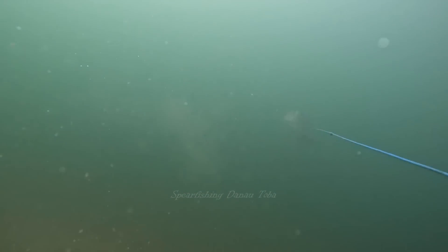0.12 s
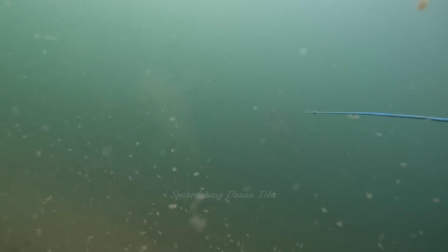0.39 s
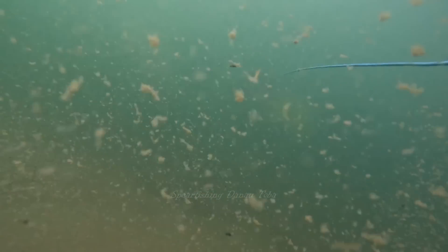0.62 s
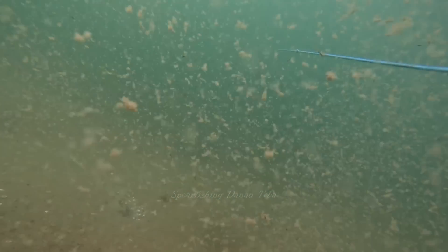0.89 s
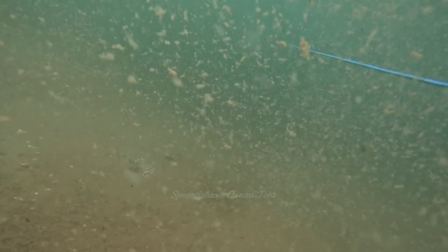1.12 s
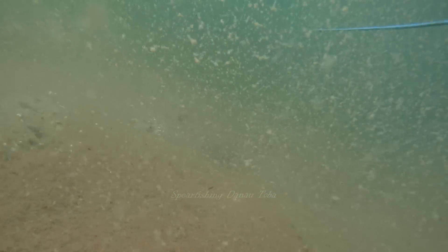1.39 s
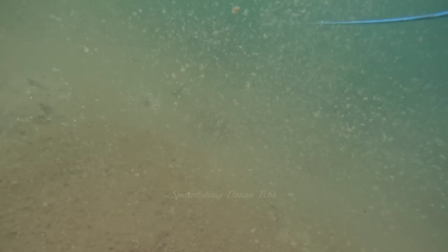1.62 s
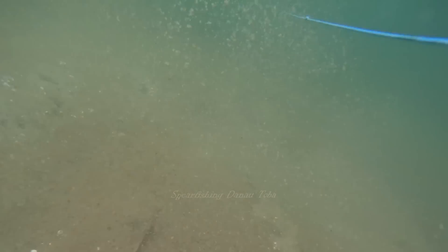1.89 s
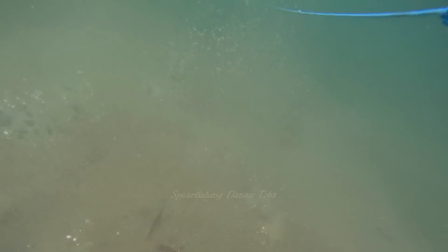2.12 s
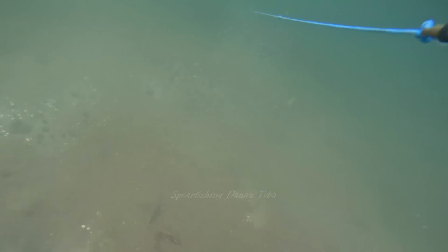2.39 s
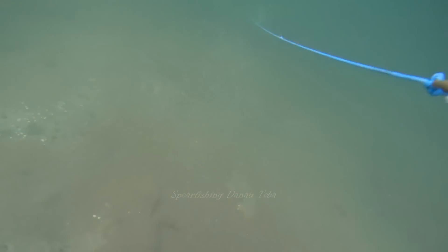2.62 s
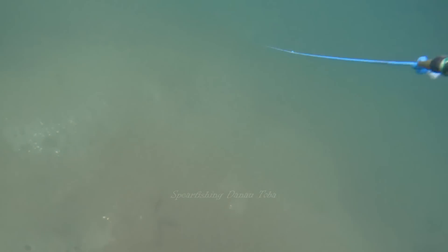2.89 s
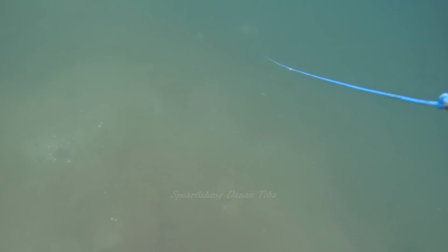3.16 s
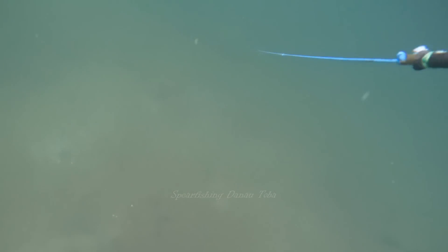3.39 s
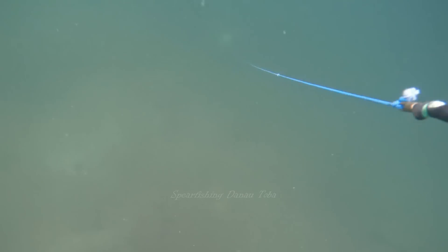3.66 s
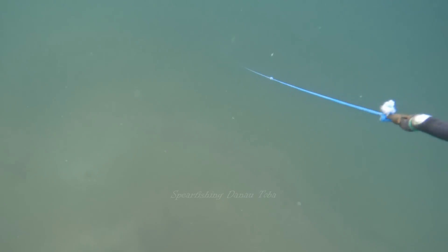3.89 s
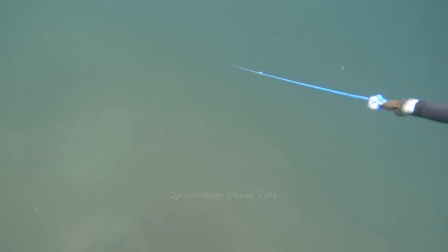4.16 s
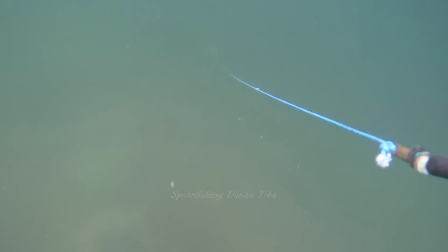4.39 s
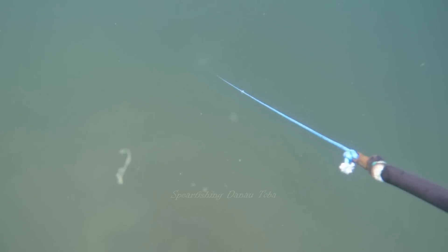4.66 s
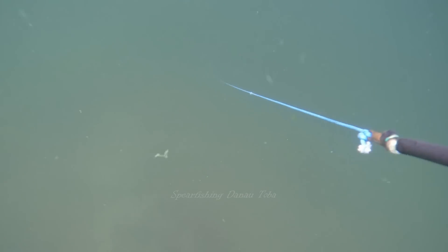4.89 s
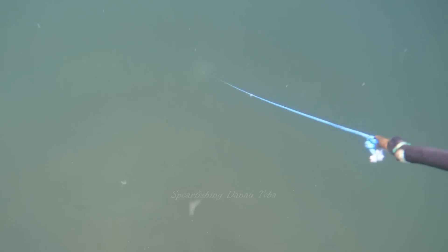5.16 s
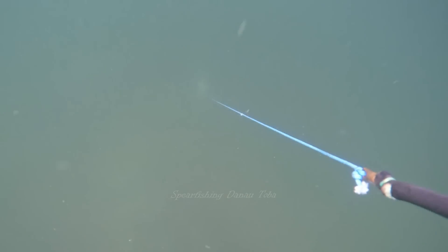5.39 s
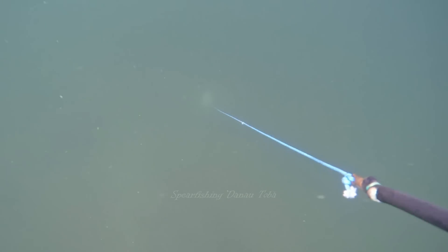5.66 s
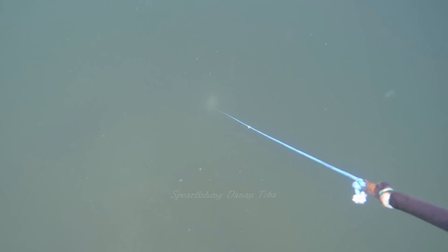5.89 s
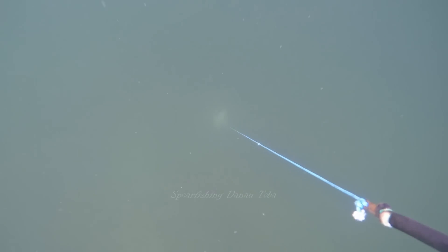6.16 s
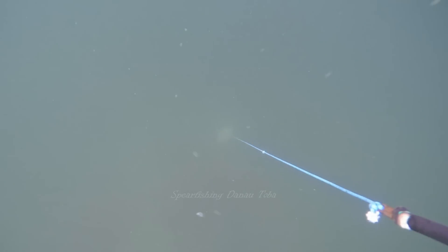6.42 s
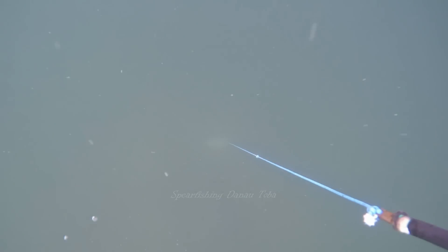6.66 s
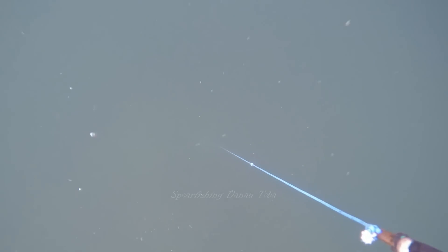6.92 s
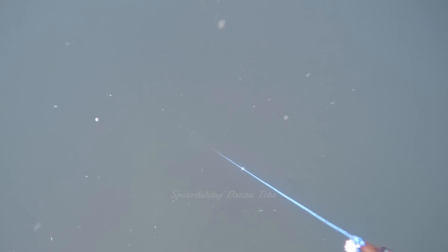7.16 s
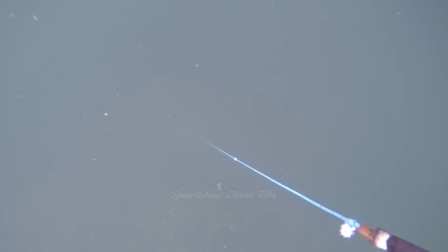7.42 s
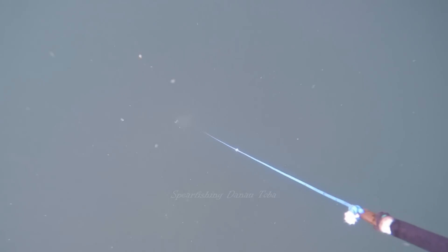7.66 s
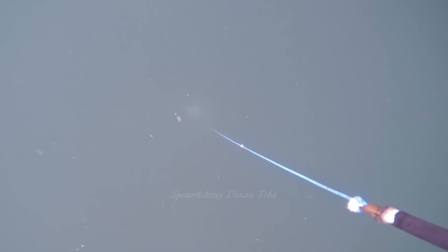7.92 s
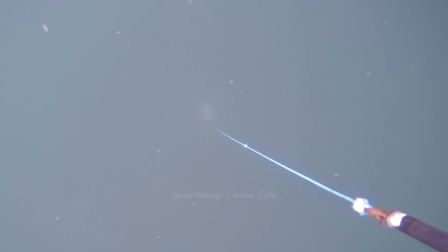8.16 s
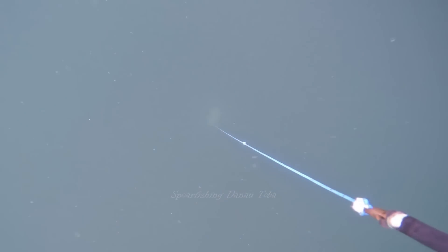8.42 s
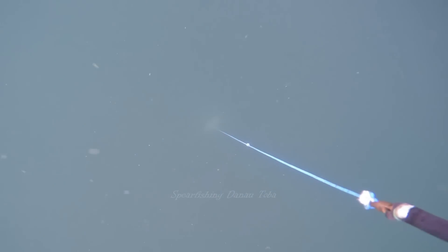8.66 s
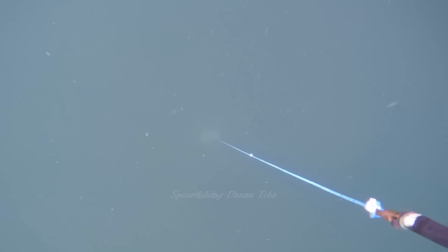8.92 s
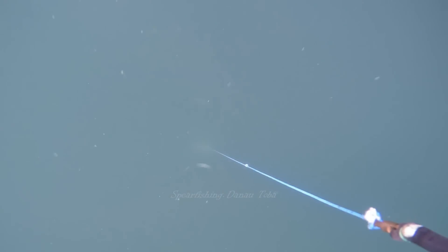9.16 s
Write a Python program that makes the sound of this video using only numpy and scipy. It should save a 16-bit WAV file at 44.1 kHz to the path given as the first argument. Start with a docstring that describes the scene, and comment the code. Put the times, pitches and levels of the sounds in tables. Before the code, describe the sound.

Underwater sound inside a plastic housing carried by a diver: boxy, muffled and dominated by bass. The first second is very quiet, with a soft knock at the start, faint rubber ticks and a dull rap near 0.75 s. A hard, hollow knock lands at 1.3 s, a creak at 1.4 s, and from 1.5 to 1.8 s deep surge and rumbling flow swell up with a few bubble pings. From 2 to 5 s low tones throb unsteadily, dull thuds come often, strongest around 3.3, 3.9 and 4.2 s, and rubber creaks stutter near 2.4, 3.6 and 4.5 s. From 4.1 s bubbles fizz and ping, crowding at 5.9, 6.1 and 6.7 to 7.2 s with sharp bright ticks. After 7.3 s they thin over continuing rumble; a knock at 8.6 s, a clear ping and tick at 8.9 s, and light fizz lead to the end at 9.3 s.

```python
"""Under water, a camera in a plastic housing rides on a diver.
Surge rocks the mount as slow heaving noise and unsteady low tones; flow drums on the shell as shaped noise.
Gear knocks and rubber creaks ring the shell's modes; small bubbles ping as damped sines and fizz close by.
Two microphones inside the shell hear the bass alike and its higher modes unequally."""
import sys
import numpy as np
from scipy import signal
from scipy.fft import rfft, irfft, next_fast_len
from scipy.io import wavfile
from scipy.ndimage import uniform_filter1d, map_coordinates

SR = 44100
rng = np.random.default_rng(int(sys.argv[2]) if len(sys.argv) > 2 else 0)


def int16_out(signal):
    """Quantize to a 16-bit WAV file."""
    q = np.round(np.clip(np.atleast_2d(signal).T, -1, 1) * 32767)
    wavfile.write(sys.argv[1], SR, q.astype(np.int16))


def gain_from_db(level_db):
    """Convert decibel levels to linear amplitude factors (20 dB per decade)."""
    decades = np.asarray(level_db, float) / 20
    return 10 ** decades


N = 410130  # length in samples


def unit(x):
    """Scale to rms 1."""
    return x / np.sqrt(np.mean(x ** 2) + 1e-20)


def along(points, hz):
    """Read a curve of (frequency [Hz], value) points on a log-frequency axis."""
    f, v = np.transpose(points)
    return np.interp(np.log(hz + 1), np.log(f + 1), v)


def curves(rows):
    """Draw one value per sample for each column after the time."""
    s, *cols = np.transpose(rows)
    return [np.interp(np.arange(N) / SR, s, c) for c in cols]


def wobble(rate):
    """A smooth random curve with rate knots a second."""
    knots = rng.standard_normal(int(N * rate / SR) + 4)
    return map_coordinates(knots, [np.arange(N) * rate / SR])


def filtered(x, response):
    """Shape x by a complex response of frequency."""
    m = next_fast_len(N + SR // 2)
    return irfft(rfft(x, m) * response(np.fft.rfftfreq(m, 1 / SR)), m)[..., :N]


def modes(table):
    """Causal response of (frequency [Hz], width [Hz], level [dB]) resonances of alternating sign."""
    def response(f):
        total = 0
        for k, (centre, width, db) in enumerate(table):
            resonance = 1j * f * width / (centre * centre - f * f + 1j * f * width)
            total = total + (-1) ** k * gain_from_db(db) * resonance
        return total
    return response


def causal(x, spectrum):
    """Pass x through the minimum-phase filter of a (frequency [Hz], level [dB]) spectrum, pulse peak 1."""
    cepstrum = irfft(np.log(gain_from_db(along(spectrum, np.fft.rfftfreq(2048, 1 / SR)))))
    cepstrum[1:1024] *= 2  # folding to positive time makes it minimum phase
    cepstrum[1025:] = 0
    pulse = irfft(np.exp(rfft(cepstrum)))
    return signal.fftconvolve(x, pulse[None] / np.abs(pulse).max(), axes=1)[:, :N]


def leading(pair, lead):
    """Put the left side ahead of the right by (frequency [Hz], phase [rad]) points."""
    return filtered(pair, lambda hz: np.exp(.5j * np.outer([1, -1], along(lead, hz))))


def grains(s, db, hz, t60, pan_db, attack, rise, bend=1):
    """Place damped sines left and right; their pitch climbs by the share rise over t60 seconds.

    A bend over 1 holds the ring, then cuts it."""
    t60 = np.clip(t60, .002, .11)[:, None]
    t = np.arange(min(SR // 16, int(t60.max() * SR))) / SR
    decay = gain_from_db(-60 * (t / t60) ** bend)
    onset = 1 - np.exp(-t / attack)
    ring = decay * onset * np.sin(2 * np.pi * hz[:, None] * t * (1 + rise * t / t60 / 2))
    ring *= gain_from_db(db)[:, None] / np.abs(ring).max(axis=1, keepdims=True)
    at = (np.round(s * SR).astype(int)[:, None] + np.arange(len(t))).ravel()
    sides = [(ring * gain_from_db(k * pan_db / 2)[:, None]).ravel() for k in (1, -1)]
    return np.array([np.bincount(at, side, N + SR)[:N] for side in sides])


def bouts(rows, rise, bend):
    """Gain of events that swell in the share rise of their fading time; bend shapes the slopes."""
    t = np.arange(0, N, 32) / SR
    power = 0
    for s, db, length, *_ in rows:
        away = np.maximum(t - s, (s - t) / max(rise, .05)) / max(length, .02)
        power = power + gain_from_db(db - 20 * away ** bend) ** 2  # 20 dB down one length after the peak
    return np.interp(np.arange(N) / SR, t, np.sqrt(power))


# left-right likeness of the noise: (frequency [Hz], coherence [0..1])
LIKENESS = [(60, 0.99), (300, 0.97), (450, 0.91), (700, 0.41), (3000, 0.057), (10000, 1)]


def rush(spectrum, patchy_db):
    """Stereo noise of rms 1 with patches of random gain in time and frequency."""
    z = signal.stft(rng.standard_normal((2, N)), nperseg=512)[2]
    field = uniform_filter1d(rng.standard_normal(z.shape[1:]), size=5, axis=0)
    field = uniform_filter1d(field, size=6, axis=1)
    pair = signal.istft(z * gain_from_db(patchy_db * unit(field)), nperseg=512)[1][:, :N]

    def mid_side(hz):
        turn = np.arccos(np.clip(along(LIKENESS, hz), -1, 1)) / 2
        return gain_from_db(along(spectrum, hz)) * [np.cos(turn), np.sin(turn)]

    mid, side = filtered(pair, mid_side)
    return unit(np.array([mid + side, mid - side]))


# a click's colour through the shell: (frequency [Hz], relative level [dB])
SNAP_COLOUR = [(700, -33), (1500, 3.5), (2200, 3), (3300, -1), (4200, -7), (5200, 1), (6000, -15),
               (6800, 3), (7300, -11.5), (7800, -15), (10000, -24.5), (15000, -38)]


def snapping(at, db, pan_db, life):
    """Each snap is a puff of noise fading over life seconds, coloured by the shell."""
    starts = np.zeros((2, N))
    starts[:, at] = gain_from_db(db + np.outer([.5, -.5], pan_db))
    puffs = signal.fftconvolve(starts, np.exp(-np.arange(600) / SR / life)[None], axes=1)[:, :N]
    noise = rng.standard_normal(N) + 0.11 * rng.standard_normal((2, N))  # nearly alike on both sides
    return causal(puffs * noise, SNAP_COLOUR)


# the flow: (time [s], strength [dB], eddies over their usual share [dB])
FLOW_COURSE = [(0.0, -60.5, -2), (0.2, -68.5, 2.5), (0.49, -65, 6.5), (0.77, -53.5, -1),
               (1.11, -52.5, 10.5), (1.53, -39.5, -2), (1.76, -41, 3.5), (1.92, -44, 6), (2.64, -45, -2.5),
               (3.52, -43, 1), (4.07, -50, 3), (4.43, -48, -2), (4.56, -51, 7), (4.82, -51, -7.5),
               (4.97, -45.5, 2.5), (5.49, -51.5, 1.5), (6.16, -48, -1), (6.55, -49, -2), (6.99, -42, 1.5),
               (7.33, -46, -1.5), (7.87, -46, 5), (8.0, -41, -3), (8.39, -48.5, 1), (9.3, -50.5, 3)]


def driven(over_db, grows):
    """Level [dB] of a layer: over_db above the mean flow, growing by grows dB for each dB of flow."""
    flow_db = curves(FLOW_COURSE)[0]
    return flow_db.mean() + over_db + grows * (flow_db - flow_db.mean())


# surge rocking the mount: (time [s], level [dB], frequency [Hz])
ROCKING = [(0.0, -44, 17.5), (0.23, -41.5, 15.5), (0.6, -47.5, 15.5), (1.79, -16, 15.5),
           (1.94, -18.5, 16.8), (2.2, -20, 17.1), (2.33, -21.5, 19.6), (3.39, -21, 19.5), (3.52, -26, 18.2),
           (4.35, -30, 21.1), (4.5, -28, 19.6), (4.95, -24.5, 19.6), (5.1, -35, 24.9), (5.33, -24.5, 25.3),
           (5.52, -26.5, 19.5), (6.52, -28.5, 16.7), (6.86, -33.5, 16.8), (6.99, -25.5, 19.5),
           (7.51, -31.5, 18.7), (7.8, -27.5, 18.2), (8.88, -27.5, 17.8), (9.07, -38, 24.7),
           (9.25, -26.5, 26.2), (9.3, -46.5, 39)]
# bouts that shake the mount's springy mode: (peak time [s], level [dB], length [s], frequency [Hz])
SPRING_SHAKES = [(1.1, -47, 0.18, 45), (1.52, -32, 0.081, 63.4), (1.6, -28, 0.048, 59.4),
                 (1.81, -31, 0.15, 59.55), (2.07, -20.5, 0.076, 64.63), (2.25, -24, 0.091, 58.6),
                 (2.67, -25, 0.11, 66.33), (2.9, -33.5, 0.24, 62.9), (3.1, -20, 0.1, 61.13),
                 (3.26, -30, 0.03, 58.1), (3.44, -30, 0.32, 63.5), (3.89, -23.5, 0.32, 61.92),
                 (4.2, -23.5, 0.037, 63.03), (4.43, -31.5, 0.45, 70.05), (4.92, -29, 0.5, 59),
                 (5.05, -19, 0.12, 58), (5.33, -21.5, 0.18, 58.24), (5.52, -30.5, 0.13, 66),
                 (5.88, -18, 0.12, 53.2), (6.17, -20, 0.18, 58.8), (6.6, -30, 0.66, 62.46),
                 (6.79, -27, 0.21, 56.35), (7.2, -38, 0.22, 64.17), (7.49, -36, .15, 46.95),
                 (7.75, -26.5, 0.17, 58.4), (8.1, -21, 0.16, 61.85), (8.24, -42, 0.22, 66),
                 (8.57, -29, 0.096, 64.86), (8.78, -24.5, 0.09, 68.7), (9.15, -45, 0.084, 49.8)]
# swells of the shell's hum: (peak time [s], level [dB], length [s])
HUM_SWELLS = [(1.5, -48, 0.3), (2.59, -37.5, 0.22), (3.39, -42, 0.36), (3.9, -28.5, 0.28),
              (4.24, -29.5, 0.39), (4.48, -35, 0.42), (4.86, -38.5, 0.49), (5.25, -38.5, 0.88),
              (5.92, -36, 0.25), (6.5, -41, 0.67), (7.18, -32.5, 0.29), (7.54, -32.5, 0.46),
              (8.05, -37, 0.57), (8.9, -45.5, 0.62)]
# colour of the surge: (frequency [Hz], relative level [dB])
SURGE_COLOUR = [(8, -33.5), (14, -1.5), (24, 2), (34, -4.5), (48, -23.5), (100, -120)]


def mount():
    """Water keeps three low modes swinging with unsteady phase, while the surge itself heaves below."""
    rock_db, rock_hz = curves(ROCKING)
    spring_hz = curves(SPRING_SHAKES)[2]

    def tone(hz, loose):
        return np.sqrt(2) * np.sin(2 * np.pi * np.cumsum(hz * (1 + loose * wobble(12))) / SR)

    hum = gain_from_db(3.3 * wobble(14)) * tone(126.2, loose=0.055)
    heave = filtered(rng.standard_normal(N), lambda f: gain_from_db(along(SURGE_COLOUR, f)))
    surge = gain_from_db(-6.5) * unit(heave)
    idle = gain_from_db(driven(over_db=1.4, grows=0.32))  # the spring never quite rests
    spring = np.hypot(bouts(SPRING_SHAKES, rise=0.78, bend=0.95), idle) * tone(spring_hz, loose=0.0712)
    rocking = gain_from_db(rock_db) * (surge + tone(rock_hz, loose=0.1472))
    return rocking + spring + bouts(HUM_SWELLS, rise=0.25, bend=0.77) * hum


# colours of the three flow layers: (frequency [Hz], relative level [dB])
RUMBLE_COLOUR = [(15, -21.5), (28, -23.5), (45, -0.5), (70, -2), (100, -14), (150, -15.5), (200, -39),
                 (400, -120)]
DRUM_COLOUR = [(100, -33), (160, -3.5), (185, -3), (215, 3.5), (270, -5), (365, 2), (440, -8), (500, -3),
               (600, -21), (750, -36), (1500, -120)]
CHURN_COLOUR = [(450, -46), (650, 0), (800, -2), (950, -2.5), (1130, -9.5), (1370, -3), (1650, -17.5),
                (2000, -9), (4000, -120)]


def flow():
    """Turbulence rumbles and drums on the shell in lumps; stronger eddies gurgle in its higher modes."""
    rumble_db, drum_db = driven(over_db=10.8, grows=1), driven(over_db=0, grows=0.96)
    churn_db = driven(over_db=-20.5, grows=1.14) + curves(FLOW_COURSE)[1]
    lumps = wobble(22)
    rumble = gain_from_db(rumble_db + 1.9 * wobble(15.0)) * rush(RUMBLE_COLOUR, patchy_db=0.5)
    drum = gain_from_db(drum_db + 1.6 * lumps) * rush(DRUM_COLOUR, patchy_db=2.5)
    rough = np.clip((churn_db + 78.5) / 16, .15, 1.0)  # hard flow breaks into lumps, slack flow runs smooth
    churn_gain = gain_from_db(churn_db + rough * (2.8 * lumps + 3.2 * wobble(40)))
    churn = churn_gain * rush(CHURN_COLOUR, patchy_db=3.5)
    u = rng.random((260, 4))  # one row a gurgle: time, mode, level, pan
    at = (u[:, 0] * N).astype(int)
    hz = np.where(u[:, 1] < .5, 950, 1380) * (1 + 0.091 * rng.standard_normal(len(u)))
    gurgle_db = churn_db[at] - 4.0 + 12 * u[:, 2]
    gurgles = grains(at / SR, gurgle_db, hz, 40 / hz, 8 * u[:, 3] - 2.5, attack=0.00057, rise=0.032)
    return rumble + drum + churn + gurgles


# knocks: (time [s], reference level [dB], thud over it [dB], rap over it [dB], air pocket [Hz])
BLOWS = [(.002, -34, -17, -28, 340), (0.084, -44, -4, -20.5, 378), (0.75, -25.5, -7.5, -7, 395),
         (1.194, -33.5, -6.5, -1.5, 370), (1.306, -15, -35.5, -29, 330), (1.661, -26, -8.5, -24, 378),
         (1.683, -22.5, -23.5, -18, 408), (1.921, -23.5, -4.5, -17.5, 335), (2.17, -28.5, 0, -40, 377),
         (2.516, -33, 3, -43, 386), (2.597, -34, -7, -32, 378), (2.637, -36.5, -4.5, -30, 394.7),
         (2.89, -23.5, 8, -22, 387.5), (3.101, -28, -3.5, -19.5, 366), (3.218, -36, 14.5, -20, 383),
         (3.301, -17.5, -4, -31, 330.5), (3.446, -34.5, 8, -16, 264), (3.546, -27.5, 6.5, -26, 392),
         (3.863, -16, 4.5, -26, 359.6), (3.983, -30, 0, -37, 396), (4.184, -15.5, 3, -36.5, 356),
         (4.264, -22, -1, -45, 339.1), (4.441, -31, 15, -31, 385), (4.483, -33.5, -0.5, -11, 405),
         (4.546, -35.5, 15.5, -21, 382), (4.834, -32, 9.5, -20.5, 374), (4.947, -25.5, -0.5, -34, 375),
         (5.012, -23, -18.5, -26, 328.6), (6.806, -34, 11, -35, 376.6), (7.149, -32.5, 8.5, -19, 324),
         (7.504, -27, 1.5, -7, 295), (7.836, -37, -8, -3.5, 284), (8.646, -21.5, -5.5, -15, 364),
         (9.133, -38, -6.5, -5, 388)]
# struck shell modes in low, middle and high groups: (frequency [Hz], width [Hz], level [dB])
STRUCK_MODES = [
    [(45, 11, -0.5), (85, 26.4, -2.5), (126.9, 6.7, 1.5), (216, 74, -13)],
    [(327, 150, -9), (352.3, 85, 1), (366, 76, -2.5), (560, 55, -13)],
    [(780, 190, -4), (968, 34, 3), (1400, 310, -4.5)],
]


def knocks():
    """A blow is a short ragged push: soft ones wake low modes, hard ones high, and trapped air bloops."""
    out, t = np.zeros(N + SR), np.arange(SR // 2) / SR
    f = np.fft.rfftfreq(len(t), 1 / SR)
    at, level_db, low_db, _, pocket_hz = np.transpose(BLOWS)
    contact = 0.016 * gain_from_db(0.39 * low_db)  # contact time [s], longer for a heavier thud
    for (s, db, thud_db, rap_db, _), length in zip(BLOWS, contact):
        click = 5 * np.exp(-t / 0.0001)
        scrape = rng.standard_normal(len(t)) * np.exp(-(t / max(length, .002) + 0.26) ** 2)
        push = rfft(click + scrape)
        for group, share_db in zip(STRUCK_MODES, (thud_db, -12.5, rap_db)):
            soften = (1 + 1j * f / group[-1][0] / 1.33) ** 4  # treble roll-off above the group
            ring = irfft(push * modes(group)(f) / soften, len(t))
            out[round(s * SR):][:len(t)] += gain_from_db(db + share_db) * ring / np.abs(ring).max()
    bloops = grains(at, level_db - 5.5, pocket_hz, 3.17 * contact, 0 * at, attack=0.0081, rise=0.03, bend=1.87)
    return out[:N] + bloops[0]


# rubber strokes on the shell: (start [s], end [s], reference level [dB], nominal slip rate [1/s])
STROKES = [(0.367, 0.372, -61, 80), (0.387, 0.416, -75, 150), (0.497, 0.498, -71, 91),
           (0.521, 0.522, -69, 120), (0.602, 0.605, -48.5, 186), (0.644, 0.648, -54, 212),
           (0.679, 0.749, -63, 170), (0.767, 0.801, -62, 170), (0.808, 0.85, -65.5, 170),
           (1.011, 1.013, -60, 230), (1.097, 1.163, -65.5, 75), (1.189, 1.251, -62, 190),
           (1.367, 1.437, -45, 95), (1.503, 1.515, -58.5, 110), (1.528, 1.549, -44, 170),
           (1.598, 1.616, -53, 170), (1.644, 1.693, -60, 100), (1.682, 1.684, -46, 180),
           (1.744, 1.746, -47, 200), (1.79, 1.793, -36.5, 200), (1.838, 1.906, -43, 200),
           (2.064, 2.084, -48, 153), (2.208, 2.273, -49, 165), (2.358, 2.365, -50, 88),
           (2.377, 2.384, -47.5, 270), (2.395, 2.413, -40, 95), (2.439, 2.439, -37.5, 314),
           (2.736, 2.747, -40, 140), (2.763, 2.806, -41.5, 160), (3.059, 3.061, -53, 190),
           (3.245, 3.258, -55.5, 230), (3.265, 3.276, -61, 190), (3.465, 3.506, -52.5, 200),
           (3.609, 3.677, -41, 172), (4.433, 4.435, -51, 200), (4.481, 4.486, -37, 220),
           (9.2, 9.237, -61.5, 130)]
# shell modes under a slip: (frequency [Hz], width [Hz], level [dB])
RUBBED_MODES = [(206.3, 12.4, 16.5), (395, 18.8, 15.5), (617, 78, -0.5), (1000, 48, -1), (1320, 110, -5.5),
                (1592, 144, -9), (2400, 150, -20.5), (2930, 190, -21.5), (5250, 310, -30.5)]


def creaks():
    """Stick and slip: uneven jolts ring the shell; a stroke bites in a few ms and eases off."""
    jolts = np.zeros(N)
    uneven = gain_from_db(2.2 * wobble(90))
    size = gain_from_db(3 * wobble(170) + 2 * wobble(35))
    grit = .012 * rng.standard_normal(N)
    for start, end, db, rate in STROKES:
        on = slice(round(start * SR), round((end + 0.0041) * SR))
        slips = np.diff(np.floor(np.cumsum(rate * uneven[on]) / SR), prepend=-1)
        bite = np.clip(np.arange(on.stop - on.start) / SR / 0.011, .75, 1)
        ease = np.clip((on.stop - np.arange(on.start, on.stop)) / SR / 0.01, 0, 1)
        gritty = grit[on] * gain_from_db(-.4 * (db + 30.0))  # light strokes are more grit than jolt
        jolts[on] += gain_from_db(db + 40.5) * ease * bite * (slips * size[on] + gritty)
    scuff = uniform_filter1d(np.abs(jolts), size=90) * rng.standard_normal(N)  # each slip scuffs for 2 ms
    jolts = jolts + 1.7 * scuff

    def shell(f):
        rasp = 1 + gain_from_db(7) * modes([(1580, 450, 0)])(f)  # the rubbed panel sharpens its own main mode
        soft = 1 / (1 + 1j * f / 6000) ** 2
        return modes(RUBBED_MODES)(f) * rasp * soft

    return filtered(jolts, shell)


# bubbles: (time [s], level [dB], frequency [Hz])
BUBBLE_PINGS = [(.037, -77, 1640), (0.072, -68, 1500), (.277, -72, 1440), (0.8643, -56.5, 2440),
                (0.9702, -45.5, 1780), (1.29, -53, 1706), (1.448, -53, 1900), (1.487, -41, 1770),
                (1.538, -42, 1760), (1.6143, -48, 1810), (1.6492, -44.5, 1830), (1.735, -45, 1000),
                (1.798, -52.5, 2470), (1.918, -46, 1760), (2.0264, -51, 1740), (2.265, -63.5, 3870),
                (2.278, -61, 3900), (2.287, -63, 3880), (2.302, -65, 2100), (3.075, -70, 3900),
                (4.017, -60, 1702), (4.033, -63, 1400), (4.0672, -52, 2360), (4.107, -48.5, 2180),
                (4.137, -43.5, 1900), (4.135, -51, 3300), (4.176, -57, 2400), (4.262, -32.5, 2204),
                (4.293, -52, 2400), (4.317, -61, 2630), (4.338, -61, 2907), (4.3905, -54, 2305),
                (4.412, -52, 2424), (4.438, -45, 1610), (4.441, -47, 2210), (4.542, -57, 2130),
                (4.5622, -55.5, 1880), (4.6196, -51.5, 3080), (4.7, -57, 4430), (4.786, -51, 2160),
                (5.025, -50.5, 1900), (5.056, -54, 2350), (5.087, -48, 2640), (5.108, -54, 1440),
                (5.112, -50, 2900), (5.243, -54, 2150), (5.257, -56, 2220), (5.37, -53, 2290),
                (5.432, -53, 2760), (5.197, -44, 1366), (5.234, -55, 2610), (5.27, -49, 2140),
                (5.3527, -49, 2143), (5.41, -51, 2470), (5.44, -48, 2080), (5.468, -50, 2530),
                (5.5545, -56, 2780), (5.659, -53, 1920), (5.7003, -48, 1990), (5.7689, -49.5, 1717),
                (5.8101, -48.5, 2250), (5.822, -54, 2300), (5.84, -57, 2030), (5.893, -53, 2045),
                (5.972, -53, 2090), (6.075, -59, 1950), (5.8623, -32.5, 2260), (5.901, -41, 2040),
                (5.922, -39.5, 2145), (5.943, -41.5, 2100), (5.9561, -40, 2070), (6.005, -53, 3170),
                (6.0154, -49.5, 1890), (6.051, -59, 1906), (6.1076, -49, 2390), (6.148, -32.5, 2167),
                (6.1692, -44, 2180), (6.2, -54, 2730), (6.22, -59, 2749), (6.295, -52, 1960),
                (6.47, -58, 2800), (6.488, -54.5, 2750), (6.596, -47.5, 2270), (6.6538, -49, 2110),
                (6.7445, -40.5, 2130), (6.764, -46.5, 1440), (6.812, -52.5, 2720), (6.882, -42.5, 2110),
                (6.903, -57, 2310), (6.916, -50, 2110), (6.93, -44, 2200), (6.9533, -33.5, 2140),
                (6.958, -41.5, 2645), (6.979, -52, 2270), (6.995, -49, 1850), (6.998, -62, 2670),
                (7.032, -48.5, 3338), (7.065, -52, 1355), (7.211, -51, 2880), (7.012, -42, 1856),
                (7.045, -43.5, 2624), (7.165, -54, 1400), (7.574, -51, 1320), (7.591, -47.5, 2062),
                (7.6743, -55.5, 2680), (7.7485, -64, 2770), (7.767, -56.5, 2760), (7.885, -58, 1383),
                (7.905, -57, 1320), (8.034, -52, 2554), (8.0728, -69, 2650), (8.167, -57, 1457),
                (7.994, -55, 1330), (8.004, -49.5, 900), (8.078, -52, 948.5), (8.23, -49.5, 913),
                (8.28, -48.5, 930), (8.312, -56, 908), (8.861, -28.5, 2040), (8.907, -40, 2084),
                (9.267, -51.5, 916)]
# sharp ticks: (time [s], reference level [dB], frequency [Hz])
SHARP_TICKS = [(0.3513, -47, 5250), (0.411, -53.5, 4140), (1.441, -42.5, 5100), (1.644, -50.5, 4200),
               (1.7937, -39, 2350), (1.968, -59, 2510), (1.953, -64.5, 5340), (2.916, -55.5, 5350),
               (3.164, -55, 2290), (3.36, -55, 5403), (3.454, -55.5, 5000), (4.069, -47, 4760),
               (4.14, -59, 3930), (4.268, -41.5, 5400), (4.3912, -45, 6330), (4.523, -67, 4950),
               (5.113, -39, 4423), (5.141, -46.5, 4530), (5.164, -43.5, 6600), (5.4056, -64, 4680),
               (5.267, -55, 8200), (5.605, -55, 7700), (5.628, -47, 4410), (5.6568, -54, 6540),
               (5.8598, -44.5, 5537), (5.8837, -40.5, 5000), (5.903, -42, 6760), (6.006, -58, 3100),
               (6.11, -45.5, 3000), (5.957, -51, 6330), (5.9872, -43, 6640), (6.1278, -44.5, 4230),
               (6.147, -38, 4200), (6.2312, -44, 4854), (6.4436, -53, 4330), (6.607, -47, 3950),
               (6.7449, -31.5, 6650), (6.784, -47, 4504), (6.8347, -44, 5600), (6.8553, -42, 5050),
               (6.881, -38, 5133), (6.955, -39.5, 3760), (6.972, -48, 7000), (6.985, -46, 6340),
               (7.033, -45, 6285), (7.1218, -55, 5000), (7.139, -50, 3950), (7.157, -46, 6470),
               (7.211, -30, 6630), (7.373, -46, 2032), (7.8329, -43, 4460), (7.97, -52.5, 3550),
               (8.087, -53.5, 3800), (8.8583, -35, 7630), (8.905, -48, 4420), (9.025, -52, 6840),
               (9.234, -52, 5550)]
# left lead of bubbles heard through the shell: (frequency [Hz], phase [rad])
THROUGH_SHELL = [(0, 0), (1550, -0.38), (1980, -0.91), (2580, -0.92), (2840, 0.74), (3190, -0.4),
                 (4220, 0.41), (4650, -0.1), (5600, -0.2), (5860, -0.0), (8350, 0.1)]


def bubbles():
    """Pings ring as a close, beating pair after a soft start; ticks are a snap with a short ring."""
    s, db, hz = np.transpose(BUBBLE_PINGS)
    t60 = 33.7 / hz  # the main ring falls 60 dB in 33.7 cycles
    apart = 1 + 0.083 * rng.standard_normal(len(s))
    pan_db = 3 + 1.3 * rng.standard_normal(len(s))
    pings = grains(s, db, hz, t60, pan_db, attack=0.0015, rise=0.03, bend=1.3)
    late = s + 0.012 * rng.random(len(s))
    partners = grains(late, db - 11.0, hz * apart, 2.5 * t60, pan_db, attack=0.0016, rise=0.031)
    s, db, hz = np.transpose(SHARP_TICKS)
    pan_db = 3 * rng.standard_normal(len(s))
    snaps = snapping(np.round(s * SR).astype(int), -63.5 + 0.54 * (db + 42.5), pan_db, life=0.0034)
    rings = grains(s, db - 7.0, hz, 45 / hz, pan_db - 2.5, attack=0.00021, rise=0.026)
    return leading(pings + partners, THROUGH_SHELL) + snaps + rings


# flurries of tiny bubbles past the shell: (start [s], end [s], swarm level [dB])
BUBBLE_FLURRIES = [(4.061, 7.447, -75.5), (7.2, 9.4, -78), (1.351, 2.301, -75), (2.602, 3.702, -81),
                   (4.062, 4.33, -70), (4.384, 4.651, -70), (4.762, 4.899, -75), (5.04, 5.23, -71),
                   (5.231, 5.491, -71), (5.541, 5.778, -73), (5.79, 6.078, -69), (6.1, 6.316, -69),
                   (6.436, 6.513, -74), (6.579, 6.705, -73), (6.72, 7.062, -69), (7.104, 7.218, -72.5),
                   (7.499, 8.105, -78), (8.82, 8.933, -73), (9, 9.296, -77)]
# colour of the hiss: (frequency [Hz], relative level [dB])
FIZZ_COLOUR = [(940, -37), (1600, -24.5), (1680, -1.5), (2120, -5), (2520, -4), (2780, -5), (3400, -6.5),
               (3900, -15.5), (4860, -8), (5790, -9.5), (6870, -15.5), (7400, -17.5), (8400, -29),
               (9200, -48.5), (11300, -61.5), (19100, -120)]
# high shell modes that grit wakes: (frequency [Hz])
GRIT_MODES = [2880, 4850, 5640, 6540, 7000, 3650]


def fizz():
    """A hiss thickens in the flurries, where tiny bubbles, pops and grit crowd; many bubbles ring near 2 kHz."""
    t, bed_db = np.arange(N) / SR, driven(over_db=-30, grows=.55)
    power = 0
    for start, end, db in BUBBLE_FLURRIES:
        shape = np.minimum((t - start) / 0.0066, (end - t) / .07)  # arrives fast, thins out slowly [s]
        power = power + gain_from_db(2 * db) * np.clip(shape, 0, 1)
    swarm_db = 10 * np.log10(power + gain_from_db(2 * bed_db))
    over_db = swarm_db - bed_db
    even = gain_from_db(1.5 * wobble(20)) * rush(FIZZ_COLOUR, patchy_db=2.2)
    hiss = gain_from_db(bed_db + 0.75 * over_db) * even
    crowd = np.cumsum((gain_from_db(1.3 * over_db) - .8) * gain_from_db(5 * wobble(25)))  # events gather where this climbs
    u, g = rng.random((1500, 5)), rng.standard_normal((1500, 3))
    at = np.searchsorted(crowd / crowd[-1], u[:, 0])
    spread = np.where(u[:, 2] < .45, .14, .6)
    hz = 2150 * np.exp(spread * np.abs(g[:, 0]) - .06)
    size_db = swarm_db[at] + 0.083 * over_db[at] - 4.0 + 17 * u[:, 1] ** 3 - 3 * np.log2(hz / 2000)
    tiny_pan_db = 2.1 + 2.0 * g[:, 1]
    tiny = grains(at / SR, size_db, np.minimum(hz, 8000), 55 / hz, tiny_pan_db, attack=0.00087, rise=0.065)
    grit_hz = np.take(GRIT_MODES, (len(GRIT_MODES) * u[:, 4]).astype(int)) * np.exp(0.09 * g[:, 1])
    grit_db = swarm_db[at] - 3.5 + 17 * u[:, 3] ** 3 - 3 * np.log2(grit_hz / 2600)
    grit_s, grit_pan_db = at / SR + .002 * u[:, 2], 1.5 + 4 * g[:, 2]
    grit = grains(grit_s, grit_db, grit_hz, 32 / grit_hz, grit_pan_db, attack=0.0006, rise=0.03)
    pop_db = swarm_db[at[::9]] - 6.5 + 14 * u[::9, 3] ** 2
    pops = snapping(at[::9], pop_db, 2.0 + 3.1 * g[::9, 2], life=0.0015)
    return hiss + tiny + grit + pops


# left over right for creaks and knocks: (frequency [Hz], level difference [dB])
SHELL_LEAN = [(60, 1.5), (120, -1), (240, 2.5), (490, 2.5), (1000, 4.5), (2020, 3), (4070, 3.5), (8220, -3)]
# left lead for creaks and knocks: (frequency [Hz], phase [rad])
SHELL_LEAD = [(0, 0.75), (690, -0.33), (1030, 1), (1290, 0.61), (1720, 1), (2150, -0.4), (2410, -1.1),
              (2760, -0.57), (3360, -0.071), (3620, 0.051), (3960, 0.1), (6120, -0.0), (7840, 0.1),
              (8350, -0.0)]


def scene():
    """Creaks and knocks reach each microphone with their own strength and phase; the rest joins them."""
    def ports(hz):
        lean, lead = along(SHELL_LEAN, hz), along(SHELL_LEAD, hz)
        return np.array([gain_from_db(k * lean / 2) * np.exp(.5j * k * lead) for k in (1, -1)])

    return mount() + flow() + filtered(knocks() + creaks(), ports) + bubbles() + fizz()


def band_limit(x):
    """A steep low-pass at the top of the band."""
    return signal.sosfilt(signal.butter(12, 14500, fs=SR, output="sos"), x)


def record(dry):
    """The preamplifier squeezes the largest swings and adds a faint self-noise."""
    soft = dry / (1 + np.abs(dry / .4) ** 4) ** (1 / 4)
    self_noise = gain_from_db(-100) * rng.standard_normal(dry.shape)
    return band_limit(soft + self_noise)


dry = scene()
out = record(dry)
int16_out(out)
```